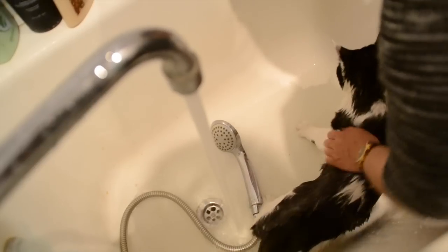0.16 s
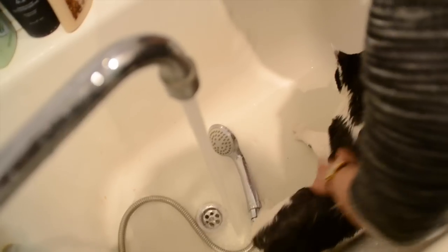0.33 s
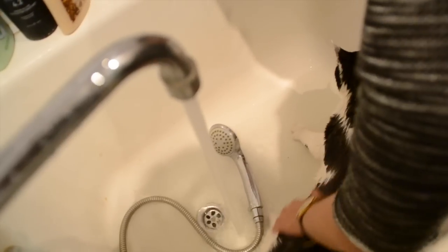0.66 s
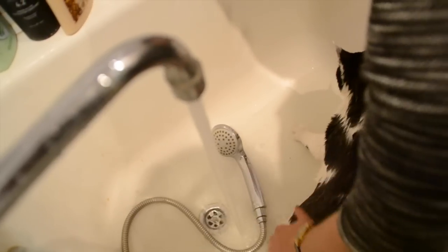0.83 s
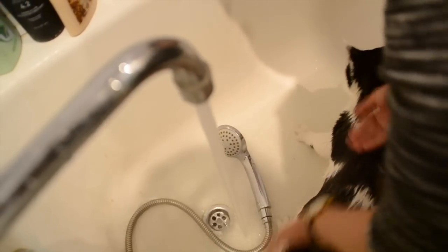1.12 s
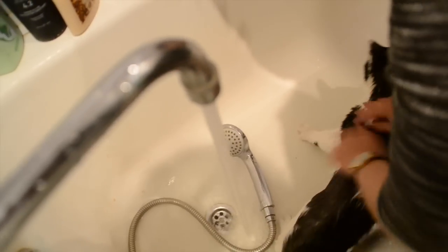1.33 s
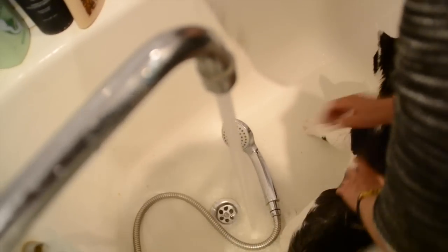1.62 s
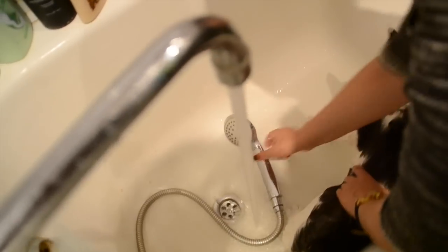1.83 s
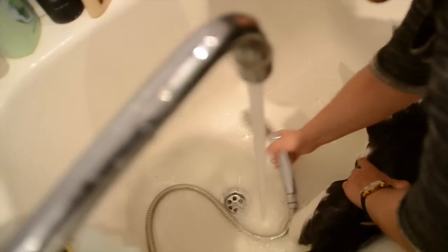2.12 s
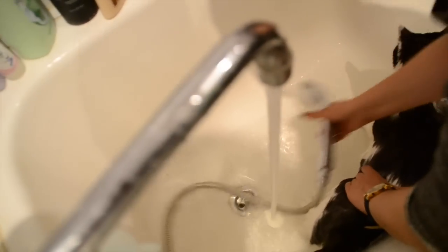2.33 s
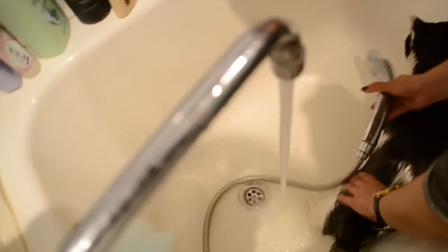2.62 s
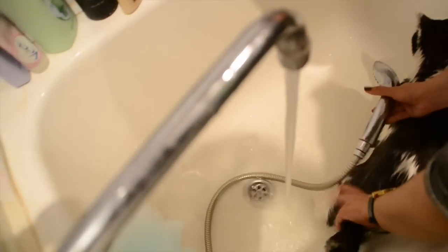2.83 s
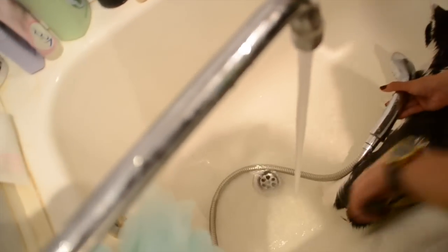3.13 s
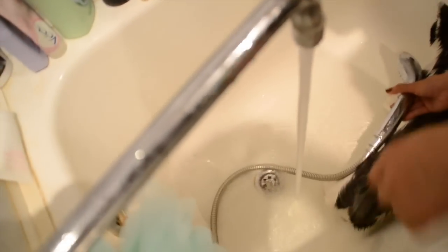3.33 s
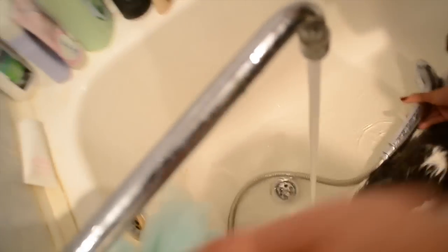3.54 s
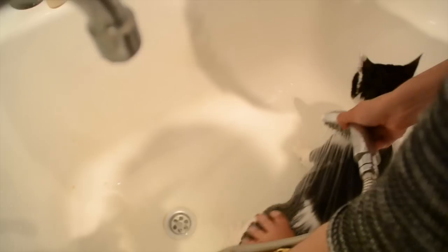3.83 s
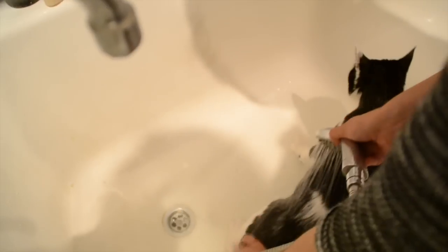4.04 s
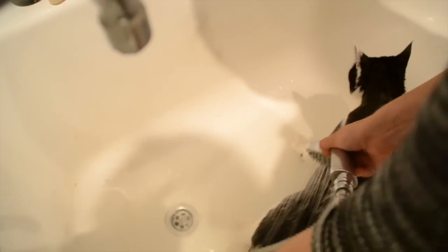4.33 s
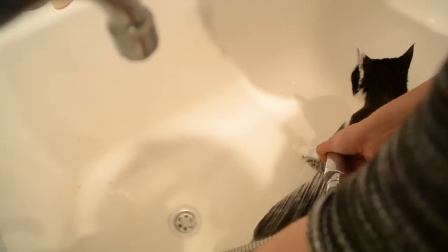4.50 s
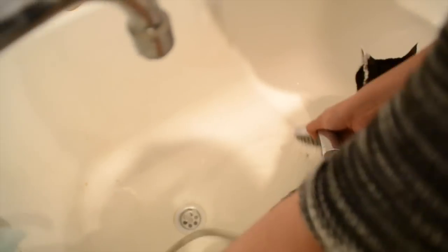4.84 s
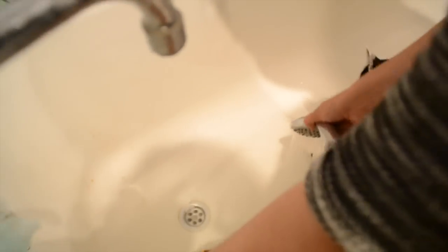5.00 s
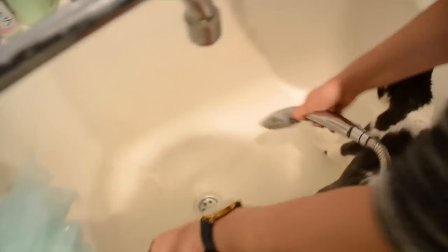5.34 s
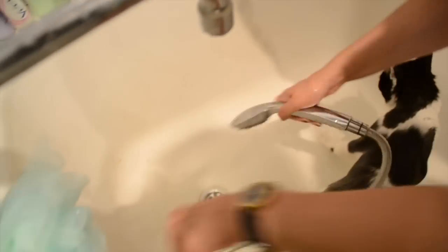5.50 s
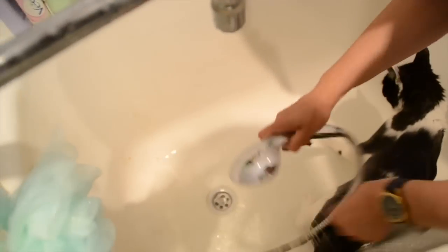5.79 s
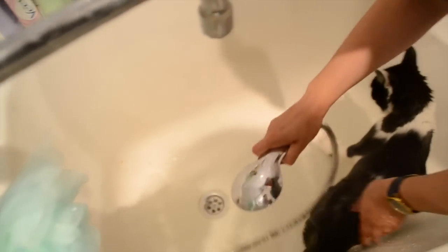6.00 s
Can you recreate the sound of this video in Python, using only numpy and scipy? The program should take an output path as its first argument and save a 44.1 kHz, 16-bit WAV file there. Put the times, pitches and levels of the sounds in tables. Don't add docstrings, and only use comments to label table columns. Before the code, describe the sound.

Water pours from a bath tap with crackling pops and glugs, cuts with a tiny tick, then a soft shower spray hisses and trickles.

```python
import sys
import numpy as np
from scipy import signal
from scipy.fft import rfft, irfft
from scipy.io import wavfile
from scipy.ndimage import uniform_filter1d

SR = 44100
rng = np.random.default_rng(int(sys.argv[2]) if len(sys.argv) > 2 else 0)


def store_wav(level_fs):
    pcm = np.round(np.clip(np.atleast_2d(level_fs), -1, 1) * 32767)
    wavfile.write(sys.argv[1], SR, pcm.T.astype(np.int16))


def amplitude_ratio(level_db):
    exponent = np.asarray(level_db, float) / 20
    return 10 ** exponent


N = 271656

CHANGE_S, RETURN_S = 3.8306, 3.8575
# (centre [Hz], width [Hz], level [dB])
MIC_NOTCH = [(7905, 330, -10)]


def evened(x):
    return x / np.sqrt(np.mean(x ** 2) + 1e-20)


def add(mix, s, sound):
    part = mix[round(s * SR):][:len(sound)]
    part += sound[:len(part)]


def bell(t, middle, length):
    return np.cos(np.pi * np.clip((t - middle) / length, -.5, .5)) ** 2


def drift(ms):
    size = max(round(ms * SR / 1000), 1)
    smooth = uniform_filter1d(rng.standard_normal(N), size)
    return evened(uniform_filter1d(smooth, size))


def bandpassed_noise(order, lo_hz, hi_hz, length):
    band = signal.butter(order, [lo_hz, hi_hz], "bandpass", fs=SR, output="sos")
    return evened(signal.sosfilt(band, rng.standard_normal(length)))


def coloured(x, colour, modes):
    hz = np.fft.rfftfreq(16384, 1 / SR)
    f, db = np.transpose(colour)
    db = np.interp(np.log(hz + 1), np.log(f), db)
    db = db + sum(top / (1 + (2 * (hz - at) / width) ** 2) for at, width, top in modes)
    log_gain = np.log(amplitude_ratio(np.concatenate([db, db[-2:0:-1]])))
    taps = np.fft.ifft(np.exp(np.conj(signal.hilbert(log_gain)))).real[:8192]
    return signal.oaconvolve(x, taps)[:N]


def bathroom(x, t60, wet_db, turns_per_s):
    t, lag = np.arange(N) / SR, np.arange(SR // 3) / SR
    tails = rng.standard_normal((3, len(lag))) * amplitude_ratio(-60 * lag / t60) * (lag > .003)
    walls = signal.butter(1, [700, 3500], "bandpass", fs=SR, output="sos")
    tails = signal.sosfilt(walls, tails)
    wet = np.zeros(N)
    for k, tail in enumerate(tails):
        share = np.cos(np.pi * (turns_per_s * t + k / 3)) * np.sqrt(2 / 3)
        wet += signal.oaconvolve(share * x, tail / np.linalg.norm(tail))[:N]
    return x + amplitude_ratio(wet_db) * wet


def tub_echo(x, t60, wet_db):
    at = np.arange(60, 6000, 20) + rng.integers(0, 20, 297)
    taps = np.zeros(6100)
    taps[at] = rng.choice([-1., 1.], 297) * amplitude_ratio(-60 * at / SR / t60)
    return x + amplitude_ratio(wet_db) * signal.oaconvolve(x, taps / np.linalg.norm(taps))[:N]


def wandering(x, pockets, unrest):
    flutter_share, wobble_share = 0.33, 0.04
    hz, t, z = signal.stft(x, SR, nperseg=2048, noverlap=1536)
    chance = rng.standard_normal((len(pockets), 2, len(t)))
    chance = evened(uniform_filter1d(uniform_filter1d(chance, size=3), size=3))
    db = np.zeros(z.shape)
    for (middle, length, at, width, top), (flutter, wobble) in zip(pockets, chance):
        height = top * np.sqrt(bell(t, middle, length))
        height = height * (1 + unrest * flutter_share * np.clip(flutter, -2, 1.2))
        centre = at * (1 + unrest * wobble_share * wobble * width / 400)
        db += height / (1 + (2 * (hz[:, None] - centre) / width) ** 2)
    return signal.istft(z * amplitude_ratio(db), SR, nperseg=2048, noverlap=1536)[1][:N]


def played(x, curve, wavers, layers, rumble_db):
    band_edges_hz = [460, 1000, 3000, 6000]
    t = np.arange(0, N + 64, 64) / SR
    s, flow_db, plunge_db = np.transpose(curve)
    flow_db, plunge_db = np.interp(t, s, flow_db), np.interp(t, s, plunge_db)
    for at, length, flow_change, plunge_change in wavers:
        moment = bell(t, at, 2 * length)
        flow_db = flow_db + flow_change * moment
        plunge_db = plunge_db + plunge_change * moment
    levels_db = [rumble_db]
    for db, slope in layers:
        levels_db.append(np.interp(np.arange(N) / SR, t, flow_db + db + slope * plunge_db))
    octave, z = np.log2(np.fft.rfftfreq(N, 1 / SR) + 1), rfft(x)
    above = [1] + [np.clip(.5 + 2 * (octave - np.log2(e)), 0, 1) for e in band_edges_hz] + [0]
    out = np.zeros(N)
    for k, db in enumerate(levels_db):
        out += amplitude_ratio(db) * evened(irfft(z * (above[k] - above[k + 1]), N))
    return out


def hose():
    # (pitch [Hz], rms level [dB])
    pipe_note = [(405.5, -61), (812, -56)]
    out = np.zeros(N)
    for hz, db in pipe_note:
        level = np.sqrt(2) * amplitude_ratio(db + .7 * drift(150))
        out += level * np.sin(2 * np.pi * np.cumsum(hz + 0.8 * drift(149)) / SR)
    return out


def spray(patchy_db, flicker_db):
    frames, hz = N // 64 + 5, np.fft.rfftfreq(256, 1 / SR)
    a, b, patches = rng.standard_normal((frames, 129, 3)).T
    patches = evened(uniform_filter1d(uniform_filter1d(patches, size=4, axis=0), size=30, axis=1))
    flicker = np.resize(drift(18)[::64], frames) * np.clip(hz / 4000, 0, 1)[:, None]
    z = (a + 1j * b) * amplitude_ratio(patchy_db * patches + flicker_db * flicker)
    return evened(signal.istft(z, nperseg=256, noverlap=192)[1][:N])


def spatter(per_s, spread_db, ms):
    size = amplitude_ratio(spread_db * np.minimum(rng.exponential(1, N), 3))
    hits = size * (rng.random(N) < per_s / SR * amplitude_ratio(4.0 * drift(40)))
    puff = np.exp(-np.arange(400) / SR * 1000 / ms)
    puffs = signal.oaconvolve(hits, puff)[:N] * rng.standard_normal(N)
    return evened(np.diff(puffs, prepend=0))


def bubble(hz, cycles, glide, rise):
    u = np.arange(round(4 * cycles * SR / hz)) * hz / SR / cycles
    ring = np.sin(2 * np.pi * cycles * (u + glide * u ** 2))
    ring = ring * (1 - np.exp(-u / rise)) * np.exp(-2 * u)
    return ring / abs(ring).max()


def bubbles(per_s, spread_db, cycles, clump_db):
    clumps = amplitude_ratio(clump_db * drift(25))
    size = amplitude_ratio(spread_db * np.minimum(rng.exponential(1, N), 2.7))
    size = size * (rng.random(N) < per_s / SR * clumps)
    kinds = np.geomspace(400, 10500, num=36)
    kind = rng.choice(len(kinds), N, p=np.sqrt(kinds) / np.sqrt(kinds).sum())
    out = np.zeros(N)
    for k, hz in enumerate(kinds):
        ring = bubble(hz, cycles * rng.uniform(0.35, 1.69), 0.03, 0.046)
        ring = evened(ring) / np.sqrt(len(ring)) * hz ** .25
        out += signal.oaconvolve(size * (kind == k), ring)[:N]
    return evened(out)


def shower():
    # (time [s], flow level [dB], plunge [dB])
    flow = [
        (3.9, -40.5, 0),
        (5.21, -39, 0),
        (5.55, -40, 0.011),
        (5.57, -38.5, 0),
        (5.98, -41, 0),
        (6.12, -38, 0),
        (6.16, -39, 0),
    ]
    # (pitch [Hz], level per Hz [dB])
    colour = [(40, -55), (68, -46), (90, -39.5), (300, -31), (500, -18), (1000, -16), (1400, -9),
              (1950, -10.5), (2500, -9), (3000, -12), (5000, -11), (7000, -17), (9500, -15.5), (10600, -22)]
    # (pitch [Hz], width [Hz], level [dB])
    pipe = [(156, 37, 4), (270.3, 14, 8.5), (396, 37, 6.5), (828, 14, 6), (1117, 20, 3), (3380, 65, 3),
            (3430, 63, -4.5), (4100, 110, 3.5), (5820, 79, 2.5)]
    # (middle [s], length [s], pitch [Hz], width [Hz], level [dB])
    head = [(4.1, 2.4, 2540, 270, 6.5), (5.15, 0.47, 2300, 340, 4), (6.07, .8, 2580, 200, 9),
            (3.95, 0.52, 6680, 280, 10.5), (4.36, .4, 6500, 200, 9), (3.68, 2.07, 1100, 420, 7.5),
            (4.86, 2.8, 1247, 67, 11.5), (5.36, 0.59, 640, 66, 11), (5.85, 0.48, 840, 32, -2),
            (6.28, 1, 1570, 55, 9), (5.67, 0.52, 1530, 80, 5.5), (4.55, .25, 6850, 150, 10),
            (4.16, 0.72, 2080, 340, -5.5), (4.9, 0.22, 2100, 2800, -1), (4.5, 0.081, 2600, 1400, 3),
            (4.7, 0.14, 4400, 3700, -3), (3.67, 1.5, 3450, 390, 7), (3.4, 3.5, 450, 210, -8),
            (5.62, 0.67, 165, 66, 9.5), (5.5, 0.12, 2900, 2000, -1.5), (4.58, 0.27, 2900, 440, 3.5),
            (4.25, 0.26, 3950, 250, 4), (4.88, 0.19, 6550, 200, 10), (5.3, .15, 3550, 250, 4),
            (4.7, .24, 6640, 180, 14.5), (4.17, .1, 1300, 300, -5), (5.3, .6, 3660, 45, 8),
            (5.7, 0.72, 4900, 110, 6), (5.43, 1.5, 8570, 270, 7), (5.63, 0.53, 2400, 150, 5),
            (5.5, .6, 4200, 140, 2)]
    # (share of flow [dB], change per dB of plunge [dB])
    layers = [(-11.5, 0.99), (-1.5, 0.4), (-1, -0.099), (2, -0.16)]
    # (middle [s], length [s], flow change [dB], plunge change [dB])
    wavers = [
        (4.2, 0.076, -0.5, -1.5),
        (4.288, 0.039, 2, -2),
        (4.86, 0.035, 2, -1.5),
        (4.96, 0.053, -2, -2),
        (5.03, 0.11, 2, 0.5),
        (5.17, 0.064, 0.5, -3),
        (5.85, .04, 0.5, 3),
        (5.97, 0.11, 0.5, -2.5),
        (6.15, 0.062, 1, -2.5),
    ]
    froth = bubbles(per_s=2500, spread_db=4.0, cycles=13, clump_db=1.0)
    water = amplitude_ratio(-11.5) * tub_echo(froth, 0.066, -2.1) + spray(patchy_db=1.0, flicker_db=0.26)
    water = bathroom(wandering(water, head, 0.77), t60=0.7, wet_db=-8, turns_per_s=0.618)
    return played(coloured(water, colour, pipe + MIC_NOTCH), flow, wavers, layers, rumble_db=-63)


def surges():
    # (time [s], peak level [dB], low [Hz], high [Hz], 60 dB decay [s])
    swells = [
        (6.04, -39.5, 900, 5000, 0.8),
        (6.09, -37, 1400, 5500, 0.65),
        (4.84, -33, 2400, 4400, 0.45),
        (4.995, -33, 2000, 5500, 0.55),
        (5.2, -37, 2000, 5300, .5),
        (4.77, -36, 1500, 5000, .4),
        (4.3, -42, 2400, 4500, 0.7),
        (5.4, -48, 1200, 4300, 0.35),
    ]
    out, t = np.zeros(N), np.arange(SR // 4) / SR
    for s, db, lo_hz, hi_hz, t60 in swells:
        burst = bandpassed_noise(2, lo_hz, hi_hz, len(t))
        rise = np.minimum(t / 0.021, 1)
        add(out, s, amplitude_ratio(db - 60 * t / t60) * burst * rise * bell(t, 0, 2 * t[-1]))
    return out


def slaps():
    # (time [s], peak level [dB], low [Hz], high [Hz], 60 dB decay [s])
    knocks = [
        (.745, -56, 130, 260, 0.22),
        (2.424, -35, 470, 810, 0.55),
        (2.423, -30.5, 570, 2800, 0.19),
        (2.85, -43, 500, 630, 0.5),
        (1.4, -29, 1800, 11000, 0.016),
    ]
    change_tick = [
        (3.8385, -46, 1200, 11000, .008),
        (3.8415, -57, 1200, 10500, .011),
    ]
    out, t = np.zeros(N), np.arange(SR // 4) / SR
    for s, db, lo_hz, hi_hz, t60 in knocks + change_tick:
        burst = bandpassed_noise(3, lo_hz, hi_hz, len(t))
        add(out, s, amplitude_ratio(db - 60 * t / t60) * burst * np.minimum(t / t60 / 0.013, 1))
    return out


def single_bubbles():
    # (time [s], peak level [dB], pitch [Hz], ring [cycles])
    pops = [(0.076, -14.5, 4400, 4.1), (0.097, -16, 6660, 6.5), (0.348, -12.5, 3860, 3.6),
            (0.5216, -10, 4800, 4.5), (0.819, -12.5, 4100, 4.3), (1.0170, -12.5, 5270, 5.9),
            (1.081, -15.5, 4130, 4.8), (1.1795, -18, 5000, 9.1), (1.2135, -14, 5006, 7.3),
            (1.2934, -13.5, 4820, 4.1), (1.3285, -15.5, 4800, 7.5), (1.5638, -25, 6060, 5),
            (1.608, -15, 5300, 8), (1.7848, -12, 8950, 5.4), (1.8733, -12, 6400, 4.1),
            (2.1508, -18.5, 4200, 9.2), (2.233, -17, 5350, 6.7), (2.2873, -18.5, 4170, 8),
            (2.3673, -9, 9200, 2.9), (2.461, -11, 7140, 5.6), (2.563, -20, 6870, 7.7),
            (2.6936, -17, 4080, 5.7), (2.936, -15, 7400, 3.9), (2.968, -15, 7300, 5.2),
            (3.008, -12.5, 7000, 6.9), (3.021, -15, 6960, 9.7), (3.088, -19, 5200, 4),
            (2.723, -18, 7400, 5), (3.1235, -14, 9150, 8.7), (3.206, -20.5, 4350, 6.5),
            (3.24, -16.5, 5700, 6), (3.5195, -15, 4070, 3.6), (3.714, -13.5, 4290, 4.5)]
    plops = [(0.1216, -21, 1700, 6.7), (0.2113, -22, 2800, 7.3), (0.3877, -21, 1990, 5.6),
             (0.7048, -22, 2210, 9.7), (0.7532, -22, 2890, 9.8), (1.0304, -17.5, 1490, 4.1),
             (1.192, -26, 1490, 9), (1.996, -19.5, 1920, 7.4), (2.08, -19, 1850, 5.1),
             (2.1428, -16.5, 1700, 4.5), (2.5450, -28, 1680, 20)]
    drips = [
        (4.125, -19, 4600, 3.5),
        (5.638, -22.5, 6040, 3),
        (5.670, -24, 7100, 5),
        (5.764, -19, 7400, 2.5),
        (5.847, -18, 7200, 2.8),
        (4.975, -25, 9600, 6),
        (5.405, -27, 6000, 6),
        (6.116, -21, 3770, 6),
    ]
    gulps = [
        (.835, -33, 653, 8.8),
        (5.322, -38.5, 618, 11),
        (5.556, -35, 1440, 20),
        (6.047, -30, 1350, 6),
        (6.07, -33, 1305, 8.6),
        (6.087, -28, 1830, 6.5),
    ]
    ticks = [(0.046, -11, 4400, 6), (0.1585, -16, 4020, 6), (0.202, -8.5, 4200, 7.2),
             (0.2952, -16, 3700, 6), (0.3351, -22, 4150, 6), (0.4574, -17, 4130, 6), (0.539, -11, 4130, 6),
             (0.644, -19.5, 5150, 6), (0.6809, -12, 4320, 6), (0.6983, -12, 4080, 6), (0.796, -10, 4220, 6),
             (1.1233, -13, 4300, 6), (1.3987, -10.5, 4150, 6), (1.8003, -16, 4150, 6.7),
             (1.8098, -12, 6570, 11), (1.937, -20, 5240, 6), (1.953, -12, 4210, 7.5),
             (1.9834, -13, 4170, 6.6), (2.1111, -14, 4320, 6), (2.171, -10, 4250, 6),
             (2.2048, -11, 4010, 5.3), (2.404, -17, 4230, 6), (2.441, -8, 7390, 6), (2.4743, -5, 6960, 6.5),
             (2.579, -11, 6760, 6), (2.61, -14.5, 4440, 6), (2.638, -8, 4270, 6), (2.7832, -11, 4140, 6.6),
             (3.1173, -12, 5350, 6.6), (3.131, -10.5, 4030, 6.8), (3.3418, -19, 4160, 6),
             (3.4695, -20, 4500, 6), (3.4774, -18, 6700, 6), (3.5794, -20, 3740, 6), (3.6526, -23, 4220, 6),
             (3.6765, -20, 4250, 6), (3.735, -12, 3960, 6), (3.7814, -17, 3950, 5.5)]
    glugs = [(2.4228, -18, 2080, 9), (2.4605, -21, 1780, 9), (2.5805, -20, 1870, 9),
             (2.6105, -16.5, 1850, 9), (2.6623, -18, 2620, 9), (2.6954, -22, 1750, 9),
             (2.7586, -19.5, 1950, 9), (2.8159, -18, 2010, 9), (2.8792, -21, 1800, 9),
             (2.9204, -20, 1700, 9.7), (2.966, -26, 1700, 8), (3.012, -22, 1700, 9), (3.1515, -17, 1860, 9),
             (3.1718, -20, 1740, 9), (3.2589, -21, 1770, 9), (3.2928, -20, 2380, 9), (3.3319, -18, 1730, 9),
             (3.379, -21.5, 1980, 9), (3.4657, -20, 1990, 9), (3.7274, -19, 2240, 9),
             (0.4559, -20, 1780, 9),
        (0.4803, -24, 1470, 7.3),
        (0.7831, -22, 1470, 9),
        (0.9697, -20, 1680, 9),
        (1.274, -20, 1480, 9),
        (1.3164, -18, 1700, 9),
        (1.467, -15.5, 2080, 9),
        (1.5432, -18, 1700, 9.7),
        (1.7125, -19.5, 2050, 9),
    ]
    trickles = [
        (4.5506, -29, 2590, 14),
        (4.595, -23.5, 2600, 14),
        (4.7755, -26, 2570, 14),
        (4.899, -32, 2460, 14),
        (5.0, -26.5, 2500, 14),
        (5.2111, -30, 2310, 14),
        (5.247, -28, 2470, 14),
        (5.5338, -34, 2450, 14),
        (5.8311, -30, 2620, 14),
    ]
    # (time [s], peak level [dB], pitch [Hz])
    spits = [(0.02, -23, 9700), (0.1366, -15, 10000), (0.3032, -12, 9760), (0.3486, -22, 8790),
             (0.5217, -23, 9010), (0.715, -20, 9550), (1.1204, -24, 9160), (1.1463, -20, 9180),
             (1.222, -12, 8890), (1.4431, -19, 8780), (1.6586, -23, 8260), (1.71, -15.5, 9050),
             (1.8612, -15, 9720), (1.8731, -16, 8650), (1.9694, -17, 8870), (2.1001, -17, 9590),
             (2.1974, -14, 9270), (2.233, -13, 8110), (2.4184, -12, 9900), (2.515, -20, 8340),
             (2.6274, -30, 9830), (2.6424, -28, 8310), (2.7312, -25, 9220), (3.1991, -14, 9390),
             (3.2824, -17, 9670), (3.3199, -21, 9400), (3.447, -18, 9600), (3.6124, -17, 8550),
             (3.8018, -26, 8980)]
    out = np.zeros(N)
    for s, db, hz, cycles in pops + plops + drips + gulps:
        add(out, s, amplitude_ratio(db + 0.5) * bubble(hz, np.clip(cycles, 1, 40), 0.0063, 0.25))
    for s, db, hz, cycles in ticks + glugs + trickles:
        add(out, s, amplitude_ratio(db - 5.5) * bubble(hz, np.clip(cycles, 1, 40), 0.011, 0.15))
    for s, db, hz in spits:
        add(out, s, amplitude_ratio(db - 2.5) * bubble(hz, 9.2, 0.01, 0.12))
    for s, db, hz, cycles in pops:
        twin = bubble(0.8 * hz, np.clip(0.51 * cycles, 1, 40), 0.02, 0.2)
        add(out, s + 0.001534, amplitude_ratio(db - 14.0) * twin)
    no_bass = signal.butter(2, 300, "highpass", fs=SR, output="sos")
    out = signal.sosfilt(no_bass, tub_echo(out, 0.052, -3.0))
    sample = np.arange(N)
    silent = (sample > CHANGE_S * SR) * (sample < RETURN_S * SR)
    return out * (1 - silent)


def jet():
    # (time [s], flow level [dB], plunge [dB])
    flow = [
        (0.0, -24, 0),
        (0.02, -27.5, 0),
        (0.81, -27, 0),
        (0.94, -27, 0),
        (1.2, -26.5, 0),
        (2.07, -29, 0.023),
        (2.18, -27, 0),
        (3.66, -27.5, 0),
        (3.73, -27.5, 0),
        (3.82, -25.5, 0.011),
    ]
    # (pitch [Hz], level per Hz [dB])
    colour = [(40, -63), (68, -39), (90, -34), (300, -24.5), (450, -22), (600, -13), (900, -12), (1500, -6),
              (2200, -5.5), (3400, -2.5), (5000, -1), (7000, -6.5), (9600, -7.5), (10600, -13)]
    # (pitch [Hz], width [Hz], level over the colour [dB])
    tub = [(93.5, 13, 10.5), (119, 15, 6), (152.4, 7.5, 9), (162.5, 2.3, 9), (267, 33, 5.5),
           (333.7, 14.7, 17), (373, 23, 4), (552, 13.6, 9.5), (637, 80, 3.5), (1126, 170, -4.5),
           (1700, 30, 3), (2410, 90, -2.5)]
    # (middle [s], length [s], pitch [Hz], width [Hz], level [dB])
    pool = [(0.2, 1.8, 1560, 350, 7), (1.85, 1.77, 1810, 510, 5.5), (3.1, 0.94, 1900, 520, 5),
            (0.49, 2.37, 4110, 410, 9), (1.54, 1.3, 4100, 440, 8), (2.87, 2.35, 4270, 330, 11),
            (0.85, 5.1, 5170, 320, 6.5), (3.74, 0.38, 4040, 300, 7), (3.1, 1.7, 6800, 600, 5),
            (0.75, 1.8, 650, 140, 2), (2.74, 0.84, 540, 46, 5.5), (2.5, 2.9, 9300, 1600, 4),
            (2.65, 0.86, 345, 23, 6), (0.092, 0.33, 325, 42, 9), (2.27, 0.23, 2100, 470, -8),
            (0.754, 0.11, 3000, 400, 9), (2.23, 1.2, 1030, 360, 5), (1.3, 0.37, 690, 450, -4.5),
            (2.16, 0.2, 440, 260, -10), (3.5, 0.6, 2100, 500, 1), (3.57, .6, 560, 100, -5.5),
            (3.3, 0.34, 2150, 710, -2.5), (3.74, .16, 4400, 700, 1.5), (3.025, .08, 4400, 350, 5.5),
            (1.62, 0.27, 3000, 810, 2), (2.88, 0.16, 4300, 500, -2), (2.5, 0.65, 1330, 58, 5.5),
            (.1, .3, 2400, 500, -2.5)]
    # (share of flow [dB], change per dB of plunge [dB])
    layers = [(-18, 0.07), (-5.5, 0.12), (-6.5, -0.31), (-5.5, -0.35)]
    # (middle [s], length [s], flow change [dB], plunge change [dB])
    wavers = [(0.01, 0.12, 2.5, -1.5), (0.746, 0.12, 1.5, -4), (1.03, 0.15, 0, 12.5),
              (1.27, 0.069, 0.5, -2.5), (2.04, 0.045, 2, 9), (2.212, 0.055, 0, -8), (2.399, 0.045, -6, -19),
              (2.45, 0.14, 2, -4.5), (2.55, 0.028, -0.5, 16), (2.633, 0.033, -1, -9), (2.727, 0.033, 2, -1),
              (2.763, 0.031, -1, 12), (2.878, 0.14, 0.5, 12.5), (3.03, 0.021, 3.5, -5),
              (3.14, 0.033, 0.5, -1), (3.183, 0.018, -1.5, 14), (3.74, 0.19, 1, -3.5),
              (0.1, 0.058, -0.5, 0), (0.202, 0.036, 0, -7), (0.37, 0.067, 0, -3.5), (0.428, 0.031, 0, 5),
              (0.55, 0.038, 0.5, -4), (1.202, 0.042, 2, 2), (1.304, .04, 3, 12), (1.593, 0.057, 3, 3),
              (1.814, 0.049, -1, -5), (1.917, 0.071, 1, 1), (3.29, 0.049, 2.5, 4), (3.455, .07, 1, 5)]
    froth = bubbles(per_s=1500, spread_db=4.0, cycles=7.8, clump_db=2.5)
    water = tub_echo(froth, 0.011, -7.5) + spray(patchy_db=0.24, flicker_db=-2.0)
    water = evened(bathroom(water, t60=0.42, wet_db=-5.5, turns_per_s=0.49))
    water = water + amplitude_ratio(-6.0) * bubbles(per_s=900, spread_db=2.5, cycles=8.7, clump_db=4.5)
    water = water + amplitude_ratio(-12.0) * spatter(per_s=220, spread_db=-3.0, ms=1.3)
    water = wandering(water, pool, 0.93)
    return played(coloured(water, colour, tub + MIC_NOTCH), flow, wavers, layers, rumble_db=-56.5)


def scene():
    t = np.arange(N) / SR
    before = amplitude_ratio(np.interp(t - CHANGE_S, [0, .0012, .004, .015, .03], [0, -40, -62, -80, -90]))
    before = before * (t < RETURN_S)
    after = np.clip((t - RETURN_S) / .02, 0, 1)
    water = before * jet() + after * (shower() + hose())
    water = water + single_bubbles() + slaps() + surges()
    return np.array([water, water])


def low_pass(x):
    return signal.sosfilt(signal.butter(12, 11180, fs=SR, output="sos"), x)


def band_limited(x, edge_hz):
    taps = signal.firwin(numtaps=191, cutoff=edge_hz, window=("kaiser", 8), fs=SR)
    return signal.oaconvolve(x, taps[None], "same")


def record(dry):
    edge_hz = 10692
    wide, narrow = band_limited(dry, edge_hz), band_limited(dry, edge_hz - 250)
    block_s = np.arange(N // 1024 + 1) * 1024 / SR
    chance = np.where(block_s < CHANGE_S, .7, .92)
    kept = 1. * (rng.random(len(block_s)) < chance)
    kept = uniform_filter1d(np.repeat(kept, 1024)[:N], size=512)
    return low_pass(narrow + kept * (wide - narrow))


dry = scene()
out = record(dry)
store_wav(out)
```